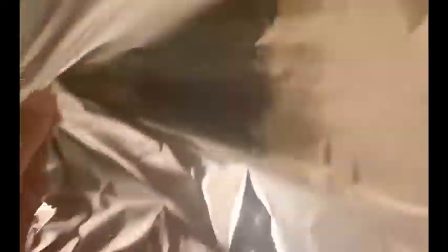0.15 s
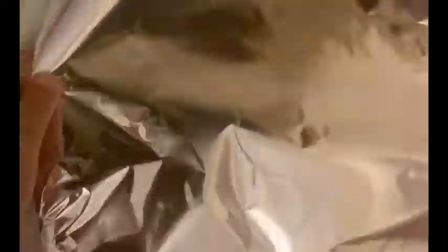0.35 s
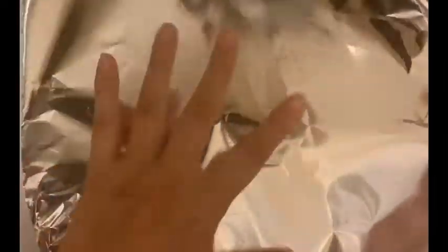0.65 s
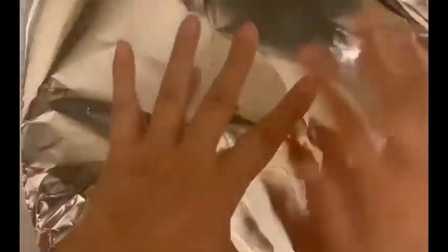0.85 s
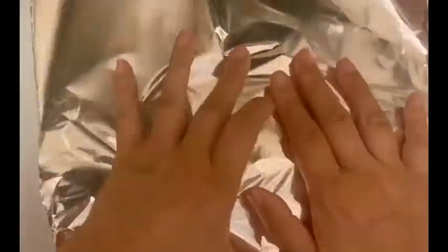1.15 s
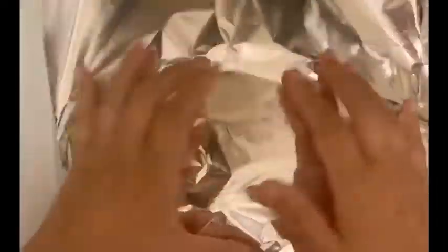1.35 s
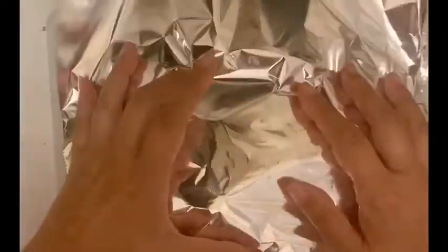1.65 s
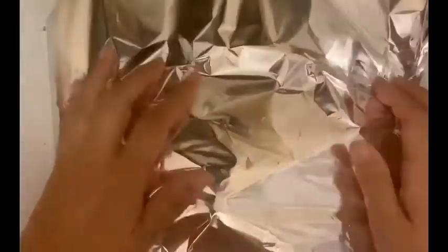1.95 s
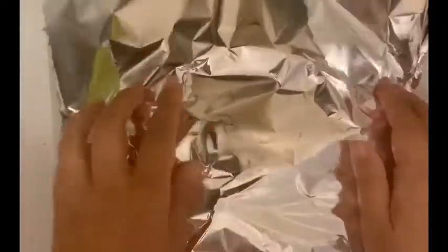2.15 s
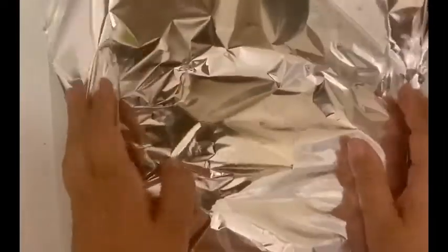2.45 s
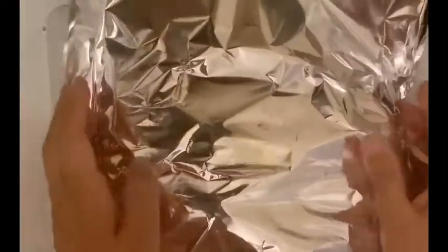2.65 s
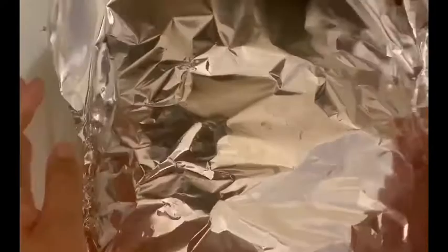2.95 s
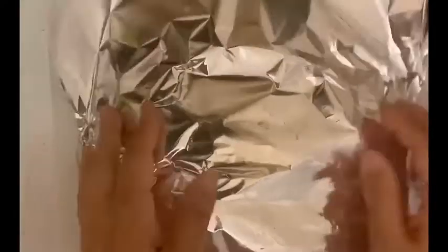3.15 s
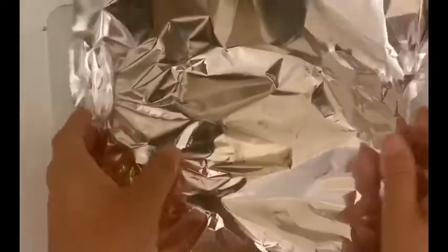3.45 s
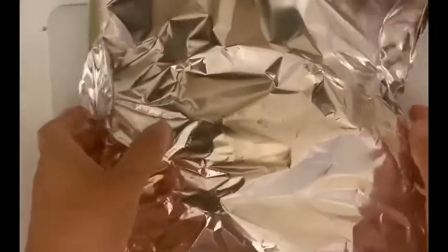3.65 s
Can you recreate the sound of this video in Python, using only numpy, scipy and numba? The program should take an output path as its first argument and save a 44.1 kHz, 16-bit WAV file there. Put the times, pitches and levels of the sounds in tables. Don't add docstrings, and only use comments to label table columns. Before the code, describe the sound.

Crinkling foil sheet: swarms of tiny metallic crackles in uneven bursts, nearly without pause

```python
import sys
import numpy as np
from scipy import signal
from scipy.fft import rfft, irfft
from scipy.io import wavfile
from scipy.ndimage import uniform_filter1d
from numba import njit

SR = 44100
rng = np.random.default_rng(int(sys.argv[2]) if len(sys.argv) > 2 else 0)


def gain_from_db(level_db):
    decades = np.asarray(level_db, float) / 20
    return 10 ** decades


def inscribe(sig):
    pcm = np.round(np.clip(np.atleast_2d(sig).T, -1, 1) * 32767)
    wavfile.write(sys.argv[1], SR, pcm.astype(np.int16))


N = 167580

# t/s, steady crackle level/dB, rumble level relative to crackle/dB
HAND_PRESSURE = [(0, -42.5, -20), (.12, -39.5, -18), (.4, -43.5, -15.5), (.62, -42, -16.5),
                 (.75, -42.5, -19.5), (.85, -29, -13), (1.3, -38.5, -12.5), (1.43, -40.5, -9),
                 (1.6, -36, -8.5), (1.95, -36, -15.5), (2.2, -34.5, -11.5), (2.5, -35.5, -11.5),
                 (2.67, -46, -13.5), (2.78, -37, -12), (2.95, -46.5, -19), (3.2, -40.5, -12.5),
                 (3.45, -39.5, -13), (3.699, -43.5, -12)]
# t/s, top level/dB, swell/s, fade/s
FOLDS_GIVING_WAY = [(0.017, -36, 0.017, 0.009), (0.05, -28, 0.018, 0.04), (0.106, -25.5, 0.02, 0.38),
                    (0.25, -21, 0.039, 0.044), (0.475, -26, 0.039, 0.053), (0.643, -26, 0.021, 0.091),
                    (0.745, -26.5, 0.018, 0.2), (0.792, -16.8, 0.015, 0.051), (0.93, -26, 0.0058, 0.15),
                    (0.992, -25.5, 0.056, 0.032), (1.063, -18, 0.011, 0.0096), (1.103, -22, 0.02, 0.39),
                    (1.178, -18.5, 0.029, 0.059), (1.314, -43, 0.0038, 0.0073), (1.327, -32, 0.011, 0.0082),
                    (1.377, -33, 0.0075, 0.036), (1.456, -23.5, 0.014, 0.035), (1.543, -23.5, 0.0074, 0.04),
                    (1.625, -26, 0.0039, 0.024), (1.665, -22, 0.0051, 0.014), (1.676, -30, 0.0157, 0.023),
                    (1.76, -24, 0.027, 0.076), (1.859, -27, 0.04, 0.099), (1.945, -36, 0.0037, 0.007),
                    (1.971, -26, 0.015, 0.187), (2.012, -19, 0.024, 0.042), (2.111, -24.5, 0.0037, 0.02),
                    (2.201, -29.5, 0.017, 0.188), (2.288, -28, 0.044, 0.012), (2.348, -41, 0.0068, 0.064),
                    (2.391, -30, 0.042, 0.012), (2.485, -26, 0.0095, 0.063), (2.546, -23.5, 0.024, 0.034),
                    (2.684, -33, 0.0057, 0.16), (2.789, -30, 0.015, 0.047), (2.816, -28, 0.0107, 0.038),
                    (2.848, -25.5, 0.0058, 0.011), (2.908, -28.5, 0.004, 0.069),
                    (2.991, -18.5, 0.042, 0.079), (3.155, -39, 0.013, 0.071), (3.2, -27, 0.0073, 0.015),
                    (3.253, -27.5, 0.015, 0.21), (3.325, -30, 0.0487, 0.028), (3.484, -27, 0.03, 0.016),
                    (3.484, -28.5, 0.0037, 0.014), (3.515, -27.5, 0.025, 0.014),
                    (3.605, -32.5, 0.0088, 0.071), (3.724, -33, 0.0289, 0.196), (.41, -27, .045, 0.13),
                    (2.965, -26.5, 0.0041, .08)]
# t/s, peak level/dB, thinning-out/s
LONE_SNAPS = [(0.0222, -37, 0.0047), (0.1582, -17, 0.0066), (0.4723, -20, 0.0079), (0.7616, -18, 0.0021),
              (0.8827, -17, 0.009), (0.9293, -14.5, 0.0059), (0.9619, -18, 0.0049), (1.0219, -11, 0.0042),
              (1.2484, -14.7, 0.009), (1.3149, -19, 0.003), (1.3418, -20.5, 0.0043), (1.3596, -16, 0.0059),
              (1.3868, -12.5, 0.0048), (1.4147, -19.8, 0.004), (1.4564, -20.5, 0.0047),
              (1.5304, -36, 0.0015), (1.6132, -11, 0.0082), (1.6986, -13.5, 0.0082), (1.7559, -21, 0.0074),
              (1.9547, -16, 0.0035), (1.9849, -32, 0.0013), (2.1159, -19, 0.0084), (2.1603, -19, 0.0028),
              (2.1923, -22, 0.0018), (2.285, -11, 0.0086), (2.3599, -19, 0.0046), (2.4357, -23, 0.0032),
              (2.4581, -33, 0.0032), (2.4694, -21.5, 0.0075), (2.6407, -34, 0.0029), (2.6915, -21, 0.002),
              (2.7151, -26, 0.0023), (2.7346, -25.5, 0.0064), (2.7904, -18, 0.0034), (2.8585, -22, 0.0065),
              (2.8833, -19.5, 0.0042), (2.9925, -11, 0.008), (3.1003, -20.5, 0.0026), (3.1225, -23, 0.0052),
              (3.1621, -19, 0.0027), (3.1937, -21, 0.0027), (3.2086, -18.1, 0.0036), (3.2388, -26, 0.0021),
              (3.3035, -24.4, 0.011), (3.3678, -34, 0.0011), (3.4493, -17, 0.0061), (3.5095, -16.7, 0.0038),
              (3.5354, -19, 0.0033), (3.5955, -22, 0.0043), (3.6791, -34, 0.004), (3.7279, -27.5, 0.0086),
              (3.7635, -21.5, 0.0042), (.1311, -14.5, 0.0067), (1.1139, -12.5, .004),
              (1.668, -17.5, 0.0028), (2.0283, -10.5, .004), (2.3305, -12, .0012), (3.468, -20, 0.0047),
              (3.2725, -17, 0.0033), (3.4875, -16, .0015)]
# f/Hz, level/dB
CRACKLE_COLOUR = [(900, -27), (2000, -24), (3500, 0), (6000, -0.5), (9000, 2), (12000, 1), (14500, -2.5),
                  (16500, -10)]
# f/Hz, level/dB
RUMBLE_COLOUR = [(200, -22), (330, 5.5), (520, -0.5), (720, -49), (1000, 4.5), (1350, 9.5), (1800, 3),
                 (2600, 11)]
# t/s, level/dB, f/Hz
TRAY_RINGS = [(0.814, -23, 486), (0.967, -28, 511), (1.052, -38, 1337), (1.188, -23, 1326),
              (1.361, -24, 1360), (1.556, -24, 1360), (1.61, -21.5, 1350), (1.67, -26, 2280),
              (1.87, -32, 1373), (1.911, -26, 1350), (1.984, -32, 1370), (2.096, -23, 1334),
              (2.262, -29.5, 1330), (2.357, -34, 1347), (2.467, -28, 1375), (2.627, -30, 1580),
              (3.48, -29, 702), (3.509, -30, 1255)]
# t/s, level/dB, f/Hz
THUMPS_AND_KNOCKS = [
    (1.327, -35, 61),
    (1.901, -45, 54.6),
    (2.23, -33, 65.6),
    (2.33, -41, 58),
    (3.329, -37, 297),
    (3.355, -36, 354),
    (3.378, -39, 407),
    (3.48, -36.5, 398),
    (3.515, -42, 411),
]
# f/Hz, level per Hz/dB
AIR_COLOUR = [(30, -15), (55, -14.5), (120, 0.5), (180, -15), (280, -7), (480, -8.5), (750, -21.5),
              (15000, -24.5)]
# f/Hz, level/dB
FRIDGE_TONES = [(59.2, -54), (118.4, -63), (236.9, -58.5)]
# f/Hz, phase/rad
PORT_LAG = [(0, 0), (860, -.6), (1550, 0), (4600, 3.14), (5300, 4.3), (6900, 6.28), (11030, 12.57),
            (17275, 21.99)]
# f/Hz, likeness/0-1
PORT_LIKENESS = [(60, .72), (250, .78), (500, .8), (900, .65), (1600, .75), (2700, .65), (4500, .76),
                 (15000, .74)]
STEREO_EDGES = [197, 207, 217, 228, 240, 264, 292, 320, 352, 388, 402, 416, 430, 443, 480, 512, 544, 580,
                594, 608, 622, 637, 672, 704, 736]
MID_KEPT = [.66, .8, 1.07, 1.46, 1.88, 2.03, 3.5]
BOTH_KEPT = [1.67, 1.76, 2.57, 2.69, 2.92, 2.97, 3.27, 3.61]


def foil():
    crackle_power, rumble_power = effort()
    dry = swarm(18000, CRACKLE_COLOUR, cycles=14.2, scatter_db=0.94, power=crackle_power)
    dry = dry + swarm(4200, RUMBLE_COLOUR, cycles=6.2, scatter_db=0.5, power=rumble_power)
    dry = dry + snaps() + tray()
    low_cut = signal.butter(2, 304, "high", fs=SR, output="sos")
    dry = signal.sosfilt(low_cut, dry)
    sheet_db = -6
    near = (dry + gain_from_db(sheet_db) * sheet(dry)) / np.sqrt(1 + gain_from_db(2 * sheet_db))
    return ports(near, sheet(dry), sheet(dry))


def effort():
    steady_db, swarm_db, flutter_db = 7.5, 0.6, -0.5
    hop = 32
    t = np.arange(0, N, hop) / SR
    at, crackle_db, rumble_db = np.array(HAND_PRESSURE, float).T
    crackle = gain_from_db(2 * (np.interp(t, at, crackle_db) + steady_db))
    for start, db, rise, fade in FOLDS_GIVING_WAY:
        since = np.maximum(t - start, 0)
        rise = max(rise, .002)
        swell = np.minimum(since / rise, 1) ** 2
        decay = np.exp(-np.maximum(since - rise, 0) / max(fade / 2, .003))
        crackle = crackle + gain_from_db(2 * db) * swell * decay
    crackle = np.repeat(crackle, hop)[:N]
    rumble_db = np.repeat(np.interp(t, at, rumble_db), hop)[:N]
    rough = gain_from_db(2 * (swarm_db * walk(30) + flutter_db * walk(132)))
    crackle = crackle * rough / np.mean(rough)
    return crackle, crackle * gain_from_db(2 * rumble_db)


def swarm(per_s, table, cycles, scatter_db, power):
    rings_per_crease, crease_s, biggest = 6, .0005, .96
    brighter_db, pivot_hz, loud_db = 1.03, 4720, -24.5
    u = rng.random((int(per_s * N / SR), 5)).T
    first = np.arange(u.shape[1]) // rings_per_crease * rings_per_crease
    within = u[0] % .001 * 1000 * crease_s * SR
    start = np.minimum(u[0, first] * N + within, N - 1).astype(np.int64)
    low_hz, high_hz = table[0][0], table[-1][0]
    hz = low_hz * (high_hz / low_hz) ** u[1]
    t60 = cycles * (0.79 + 1.13 * u[2]) / hz
    size_db = colour(table, hz) - scatter_db * np.log(1 - biggest * u[3, first])
    size = gain_from_db(size_db) * hz / 1000
    norm = np.sqrt(np.sum(size ** 2 * t60) / 4 / np.log(1000) * SR / N)
    effort_db = 10 * np.log10(power[start])
    octaves = np.log2(np.maximum(hz / pivot_hz, 1))
    tilt_db = brighter_db * octaves * np.minimum(effort_db - loud_db, 0)
    return rings(N, start, hz, t60, size * gain_from_db(effort_db + tilt_db) / norm, 2 * np.pi * u[4])


def snaps():
    low_hz, high_hz, snap_db, t60_s = 1580, 16240, -7, 0.0035
    at, db, spread = (np.repeat(c, 64) for c in np.array(LONE_SNAPS, float).T)
    u = rng.random((len(at), 4)).T
    late = -np.maximum(spread, .001) * np.log(1 - .99 * u[0] ** 1.4)
    start = ((at + late) * SR).astype(np.int64)
    hz = np.minimum(low_hz + (high_hz - low_hz) * u[1], .36 * SR)
    size = gain_from_db(db + snap_db + colour(CRACKLE_COLOUR, hz))
    return rings(N, start, hz, t60_s * (0.35 + u[2]), size, 2 * np.pi * u[3])


def sheet(x):
    t60_s, hop = .05, 1024
    t = np.arange(3 * hop) / SR
    parts = np.pad(x, (0, -N % hop)).reshape(-1, hop)
    fade = np.exp(-np.log(1000) * t / t60_s)
    tails = rng.standard_normal((len(parts), len(t))) * fade / np.sqrt(np.sum(fade ** 2))
    rung = irfft(rfft(parts, 4 * hop) * rfft(tails, 4 * hop)).reshape(len(parts), -1, hop)
    out = sum(np.pad(rung[:, k], ((k, 3 - k), (0, 0))) for k in range(4))
    return out.ravel()[:N]


def tray():
    at, db, hz = (np.repeat(c, 2) for c in np.array(TRAY_RINGS, float).T)
    u = rng.random((len(at), 2)).T
    start = ((at + 0.00605 * u[0]) * SR).astype(np.int64)
    pitch = hz * (.985 + 0.032 * u[1])
    t60 = np.full(len(at), 0.15)
    return rings(N, start, pitch, t60, gain_from_db(db - 10.0), np.full(len(at), -np.pi / 2))


def knocks():
    at, db, hz = np.array(THUMPS_AND_KNOCKS, float).T
    t60 = np.full(len(at), 0.15)
    x = rings(N, (at * SR).astype(np.int64), hz, t60, gain_from_db(db), np.full(len(at), -np.pi / 2))
    return uniform_filter1d(x, size=40)


def kitchen():
    return ports(*[air() + hum() for _ in range(3)])


def air():
    hz = np.arange(N // 2 + 1) * SR / N
    spectrum = rfft(rng.standard_normal(N)) * gain_from_db(colour(AIR_COLOUR, hz))
    return unit(irfft(spectrum, N)) * gain_from_db(-47)


def hum():
    wobble_hz, wobble_db, wobble_rad = 9, 3, 1.84
    t = np.arange(N) / SR
    out = np.zeros(N)
    for hz, db in FRIDGE_TONES:
        level = np.sqrt(2) * gain_from_db(db + wobble_db * walk(wobble_hz))
        out += level * np.sin(2 * np.pi * hz * t + wobble_rad * walk(wobble_hz))
    return out


def ports(shared, left, right):
    hz = np.arange(N // 2 + 1) * SR / N
    like = np.clip(colour(PORT_LIKENESS, hz), 0, 1)
    lag = np.exp(-1j * np.interp(hz, *np.array(PORT_LAG, float).T))
    both = rfft(shared) * np.sqrt(like)
    own = np.sqrt(1 - like)
    return np.array([irfft(both + own * rfft(left), N), irfft(both * lag + own * rfft(right), N)])


@njit
def rings(n, start, hz, t60, size, turn):
    out = np.zeros(n)
    for k in range(len(start)):
        p = np.exp(2j * np.pi * hz[k] / SR - np.log(1000) / (t60[k] * SR))
        z = size[k] * np.exp(1j * turn[k])
        for i in range(start[k], min(n, start[k] + int(t60[k] * SR * .8) + 2)):
            out[i] += z.real
            z *= p
    return out


def walk(rate_hz):
    k = max(int(SR / rate_hz), 2)
    steps = np.interp(np.arange(N) / SR * rate_hz, np.arange(2000), rng.standard_normal(2000))
    return unit(uniform_filter1d(steps, k))


def colour(table, hz):
    f, v = np.array(table, float).T
    return np.interp(np.log(np.maximum(hz, 1)), np.log(f), v)


def unit(x):
    return x / np.sqrt(np.mean(x ** 2))


def scene():
    return foil() + knocks() + kitchen()


def squeeze(x):
    drop_mid_db, drop_side_db = -3.7, -3.5
    grid, around, top_line, mid_top_line = 416, 8, 732, 460
    ms = np.pad(np.array([x[0] + x[1], x[0] - x[1]]) / 2, ((0, 0), (grid, 2048)))
    win = np.sin(np.pi * (np.arange(2048) + .5) / 2048)
    z = signal.stft(ms, window=win, nperseg=2048, noverlap=1024)[2]

    def kept(times):
        return np.isin(np.arange(z.shape[2]), np.round((np.array(times) * SR + grid) / 1024))

    both_kept = kept(BOTH_KEPT)
    low_mid_kept = both_kept | kept(MID_KEPT)
    for lo, hi in zip(STEREO_EDGES, STEREO_EDGES[1:]):
        power = np.sum(np.abs(z[:, lo - around:hi + around]) ** 2, axis=1)
        mid, side = 10 * np.log10(uniform_filter1d(power, 2) + 1e-18)
        mid_kept = low_mid_kept if lo < mid_top_line else both_kept
        z[0, lo:hi] *= (mid - side > drop_mid_db) | mid_kept
        z[1, lo:hi] *= (side - mid > drop_side_db) | both_kept
    z[:, top_line:] = 0
    m, s = signal.istft(z, window=win, nperseg=2048, noverlap=1024)[1][:, grid:grid + N]
    return np.array([m + s, m - s])


def top_cut(x):
    return signal.sosfilt(signal.butter(12, 16840, fs=SR, output="sos"), x)


def record(dry):
    mix = squeeze(dry)
    return top_cut(mix)


dry = scene()
out = record(dry)
inscribe(out)
```